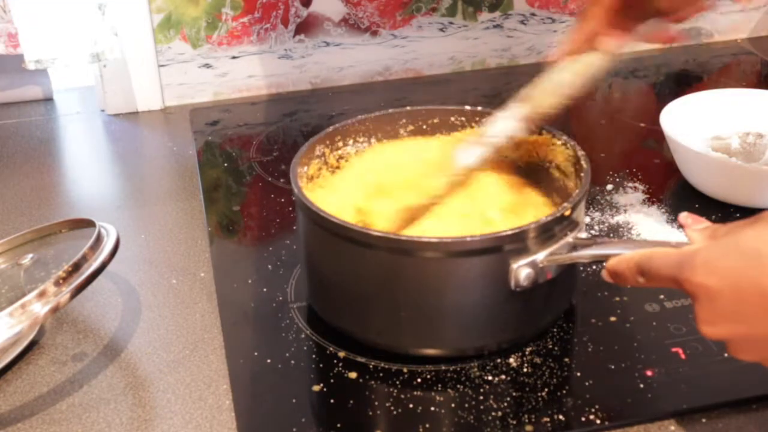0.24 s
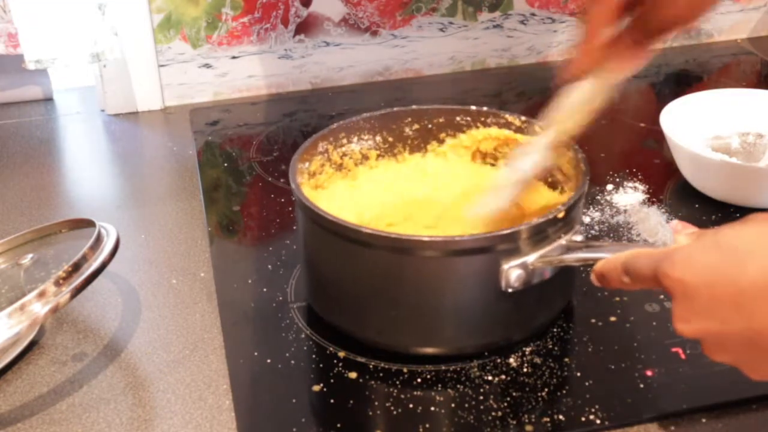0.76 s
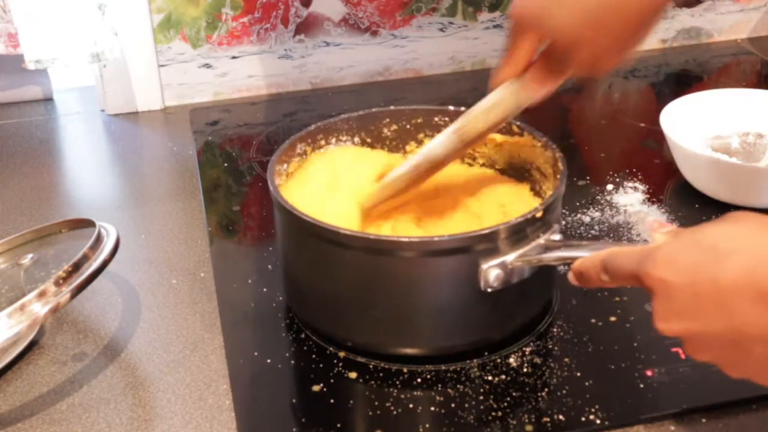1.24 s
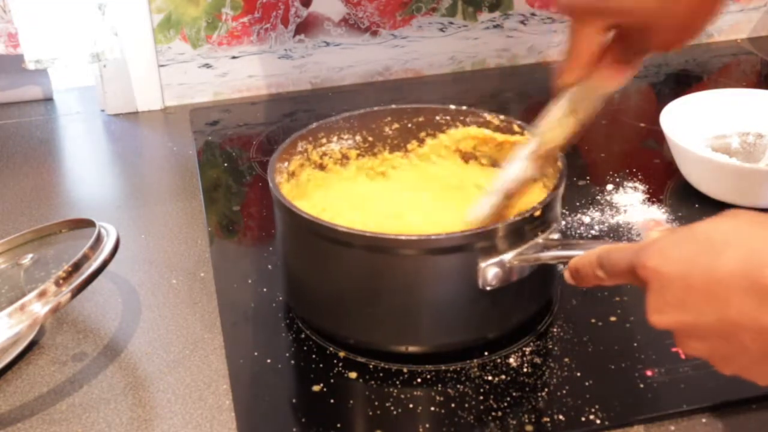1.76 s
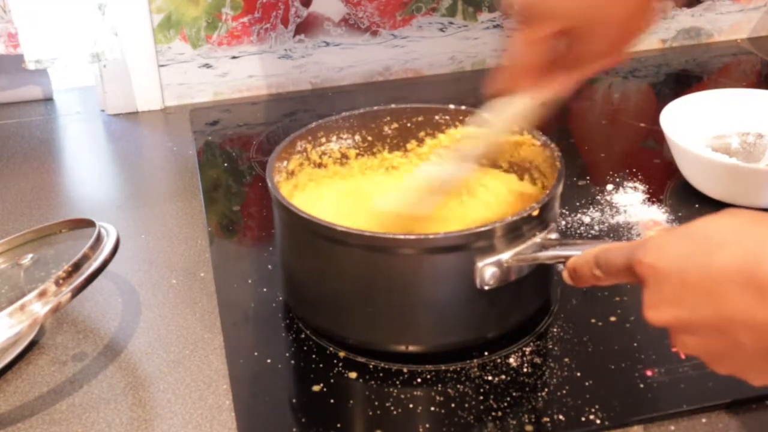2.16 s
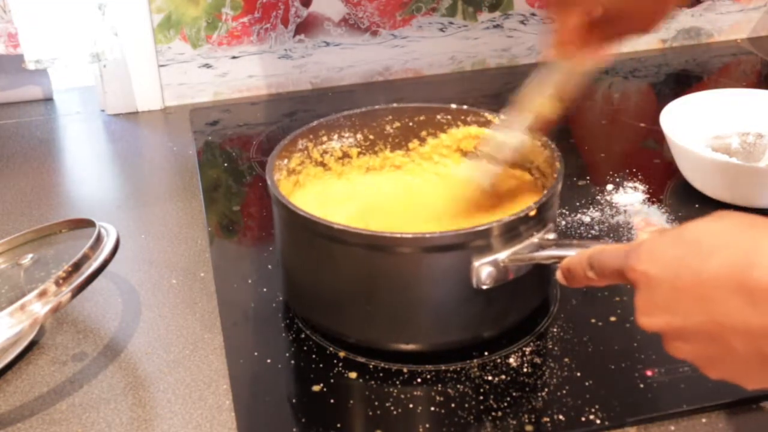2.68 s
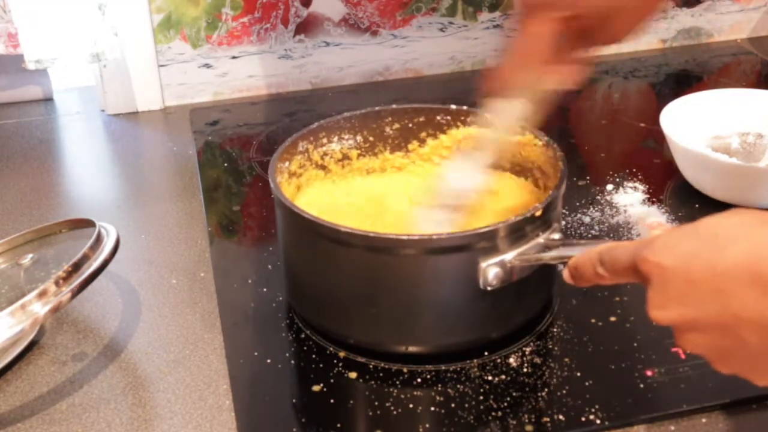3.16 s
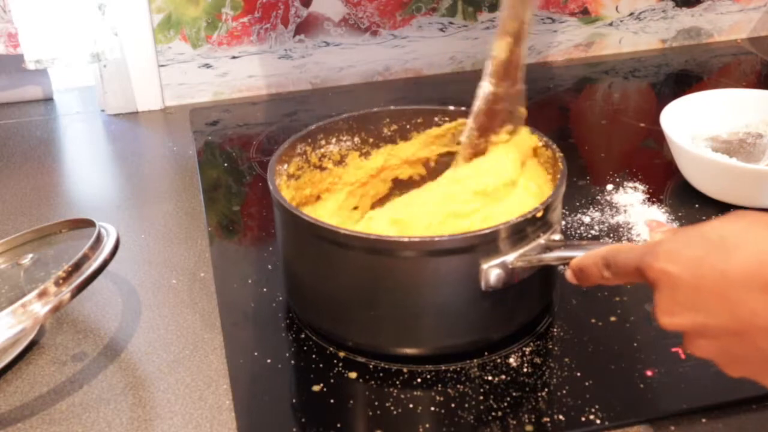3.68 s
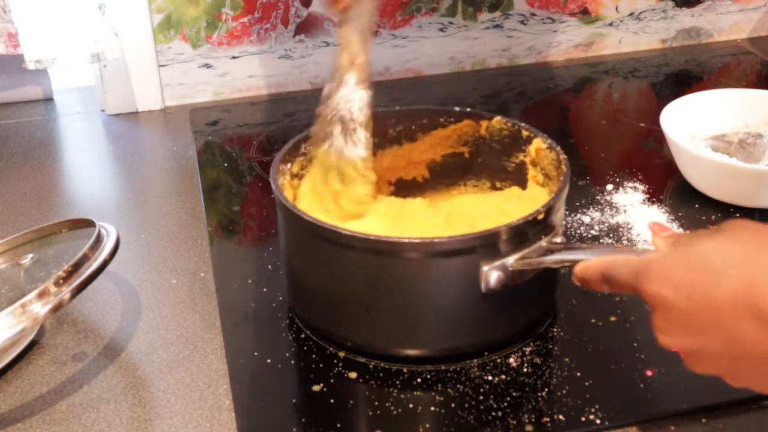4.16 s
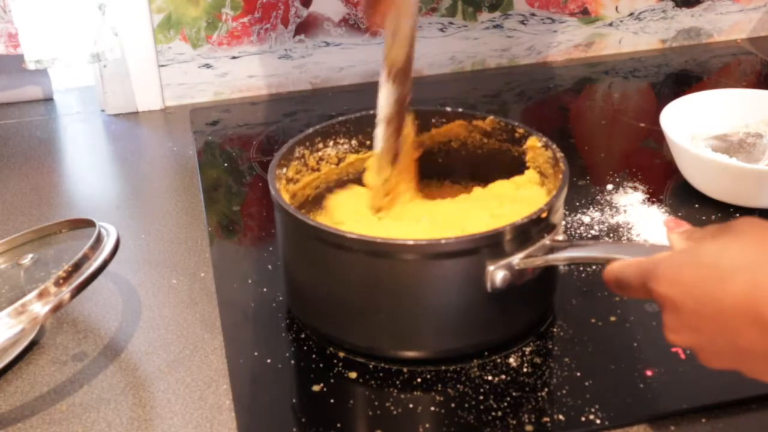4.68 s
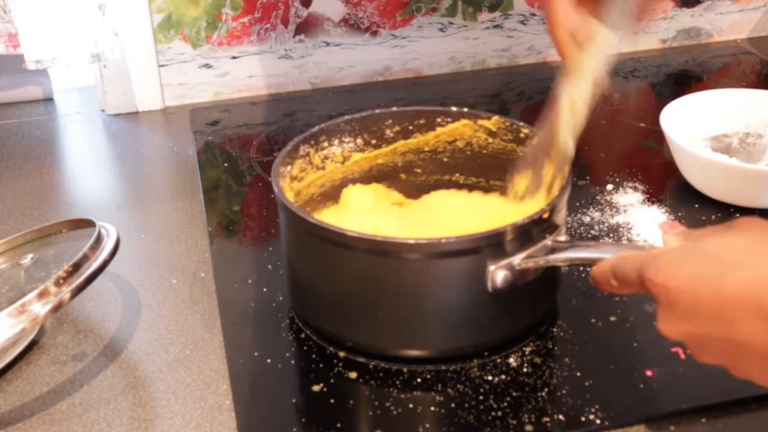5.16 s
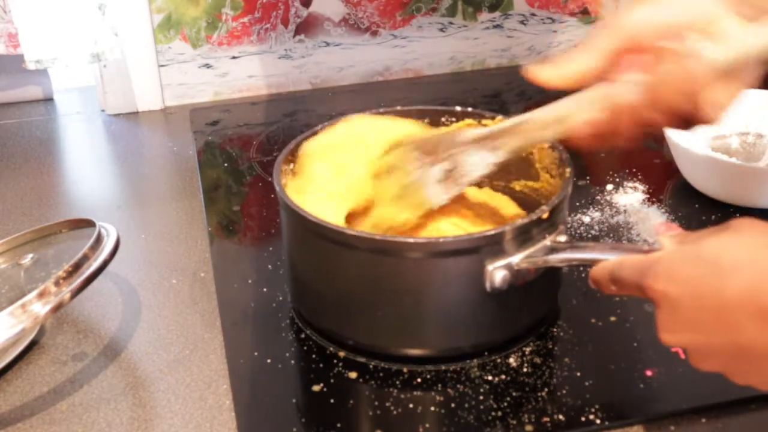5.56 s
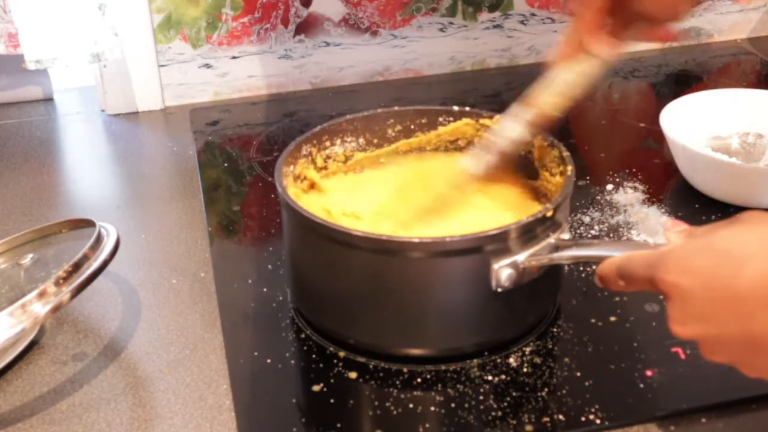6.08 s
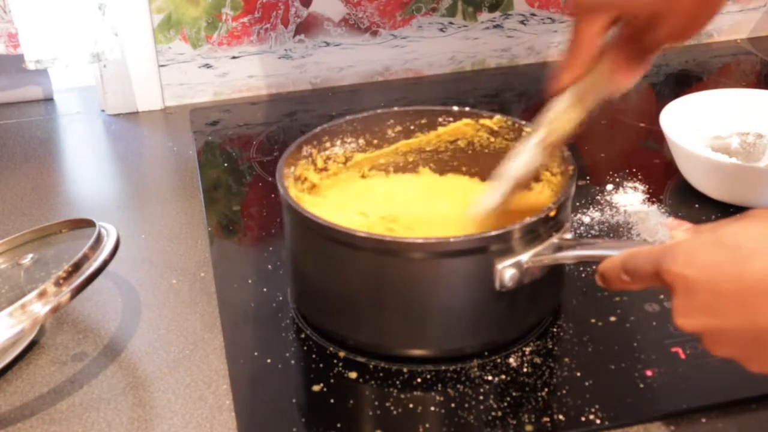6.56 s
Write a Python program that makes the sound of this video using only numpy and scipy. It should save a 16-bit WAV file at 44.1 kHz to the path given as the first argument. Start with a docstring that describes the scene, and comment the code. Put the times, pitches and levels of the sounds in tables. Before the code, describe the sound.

Close up in a small, hard-surfaced room, thick dough is stirred briskly in a saucepan. Wood bumps the filled pan with hollow, quickly damped knocks in an uneven rhythm. After about three seconds the knocking nearly stops, leaving scraping, moist peeling and little snaps; then scattered knocks resume and end strongest. A soft low rush of ventilation stays underneath.

```python
"""In a small kitchen, a wooden spatula works stiff dough round a metal saucepan on a glass hob.
Each turn bumps the pan softly through the dough, then knocks on its bare wall: fading sine waves make
the wood clack and the filled pan ring. Between knocks, random clicks and filters make the dough smear,
hiss and drag. Short noise bursts are its sticky ticks, and sliding resonances are skids on the metal."""
import sys
import numpy as np
from scipy import signal
from scipy.fft import rfft, irfft
from scipy.io import wavfile
from scipy.ndimage import uniform_filter1d

SR = 44100
rng = np.random.default_rng(int(sys.argv[2]) if len(sys.argv) > 2 else 0)


def store_pcm(level_fs):
    """Save levels as 16-bit WAV."""
    pcm = np.round(np.clip(level_fs, -1, 1) * 32767).astype(np.int16)
    wavfile.write(sys.argv[1], SR, np.atleast_2d(pcm).T)


N = 301203

# spatula against the pan: t/s, relative level/dB, hardness of the contact as its corner f/Hz,
# boost of the strongest pan modes/dB, boost of the wall mode/dB
KNOCKS = [(0.0, -14.5, 500, 12, -5), (0.344, -19.5, 580, 0, -5), (0.433, -21.5, 586, -13, 1),
          (.718, -34.5, 226, -13, -7), (0.843, -14, 850, 1.5, 0.5), (1.170, -18, 880, -1.5, 1.5),
          (1.428, -17.5, 530, -18, 0), (1.545, -18, 1020, 0.5, -5.5), (1.766, -28.5, 243, -1, -4),
          (1.891, -17, 1030, 2.5, -8), (2.119, -15, 664, -9, 1), (2.220, -13, 1190, 2, -3.5),
          (2.444, -15.5, 550, -19, 2), (2.559, -17.5, 900, 3, -4), (2.767, -25, 281, -6.5, 0),
          (2.841, -28.5, 1006, 7, 1), (3.111, -21.5, 485, -4, -10), (4.097, -38, 370, 11, 2),
          (4.733, -19, 1000, 2.5, -1.5), (5.141, -19.5, 1030, -1, -9), (5.192, -23, 650, -3, -7),
          (5.748, -28.5, 1170, -3, -1), (5.756, -17, 324, -4, -21), (6.165, -32, 394, 8, -1.5),
          (6.325, -18, 736, -6, 4), (6.568, -19, 497, -23, 3), (6.656, -12, 910, 5, 3.5)]


def amp(db):
    """Turns decibels into a gain."""
    return 10 ** (np.asarray(db) / 20)


def unit(x):
    """Scales a sound to an rms of 1."""
    return x / np.sqrt(np.mean(x ** 2) + 1e-20)


def read(points, hz):
    """Reads a table between its points, on a log-frequency axis."""
    f, value = np.transpose(points)
    return np.interp(np.log(hz + 1), np.log(f + 1), value)


def colour(x, points):
    """Filters a sound by a table of f/Hz, gain/dB."""
    size = x.shape[-1]
    hz = np.fft.rfftfreq(2 * size, 1 / SR)
    spectrum = rfft(x, 2 * size) * amp(read(points, hz))
    return irfft(spectrum)[..., :size]


def add(mix, s, sound):
    """Mixes a sound in at a time in seconds."""
    part = mix[max(round(s * SR), 0):][:len(sound)]
    part += sound[:len(part)]


def spread(pair):
    """Turns two unrelated signals into left and right, alike in the bass."""
    # width of diffuse sound: f/Hz, side over mid/dB
    side_over_mid = [(60, -26), (150, -14.5), (330, -13.5), (480, -7.5), (1000, -0.5), (3000, 0.5),
                     (8000, 2), (14000, 5)]
    side = colour(pair[1], side_over_mid)
    both = np.array([pair[0] + side, pair[0] - side])
    # take back the power that the side signal added
    return colour(both, [(hz, -10 * np.log10(1 + amp(db) ** 2)) for hz, db in side_over_mid])


def air(level_db=-48.5):
    """The steady rush of the hob's fan and the room, as filtered noise."""
    # steady kitchen background: f/Hz, relative level/dB
    air_colour = [(15, -52), (25, -24), (75, -23.5), (100, -2.5), (169, -4.5), (226, 0.5), (257, -5.5),
                  (391, -3), (978, -19.5), (1240, -16.5), (1410, -21), (1930, -16.5), (2380, -22),
                  (3530, -24.5), (13100, -32)]
    noise = spread(rng.standard_normal((2, N)))
    return amp(level_db) * unit(colour(noise, air_colour))


def kitchen(x, wet_db, echo_db, build_s=0.0028, lag_s=0.00008):
    """Direct sound, a few close reflections, and a diffuse tail that fades at its own rate at each pitch."""
    # wall, hood and cupboards: delay/s, relative level/dB
    echoes = [(.0058, -4), (0.0112, -4.5), (.0212, -11.5), (0.0255, -9.5)]
    # how long the tail lasts: f/Hz, time to fall by 60 dB/s
    tail_times = [(80, 1), (250, 0.16), (800, 0.39), (2500, 0.21), (6000, 0.73), (13000, 0.26)]
    noise = rng.choice([-1., 1.], (2, SR // 2))
    hz, t, z = signal.stft(noise, SR, nperseg=256)
    fade = amp(-60 * t / read(tail_times, hz)[:, None])
    tail = signal.istft(z * fade, SR, nperseg=256)[1]
    tail = spread(tail / np.linalg.norm(tail[0]))
    # tone of the room's tail: f/Hz, gain/dB; weaker in the bass, fullest near 2 kHz, dull at the top
    tail = colour(tail, [(100, -7), (330, 1), (520, -1), (2000, 4.5), (10000, -19.0)])
    build = 1 - np.exp(-np.arange(tail.shape[1]) / SR / build_s)
    response = amp(wet_db) * tail * build
    response[:, 0] += 1  # the direct sound
    for k, (delay, db) in enumerate(echoes):
        for channel, side in zip(response, (-1, 1)):
            # successive echoes reach left and right first in turn
            add(channel, delay + side * (-1) ** k * lag_s, amp([db + echo_db]))
    return signal.fftconvolve(x[None], response, axes=1)[:, :N]


def bareness(corner_hz, bare_above_hz=740, blend_hz=45.3):
    """Slides from 0 for a blow through dough to 1 for a blow on bare metal."""
    return 1 / (1 + np.exp((bare_above_hz - corner_hz) / blend_hz))


def swell(s, rise_s, hold_s, fade_db_per_s, sag_db_per_s=13.5):
    """One push of the blade as a gain: it rises, sags while held, then fades."""
    t = np.arange(N) / SR - s
    attack = np.sin(np.pi / 2 * np.clip(t / max(rise_s, 1 / SR), 0, 1)) ** 2
    sag_db = sag_db_per_s * np.clip(t - rise_s, 0, hold_s)
    fade_db = fade_db_per_s * np.maximum(t - rise_s - hold_s, 0)
    return attack * amp(-sag_db - fade_db)


def stirring():
    """Gains of peeling, smearing and drag: the powers of strokes and of the rubbing after blows add up."""
    # pushes through the dough: t/s, rise/s, hold/s, relative peeling/dB, relative smearing/dB
    strokes = [(0.0, 0.0013, 0.0029, -44.5, -31.5), (0.14, 0.16, 0.044, -47, -50.5),
               (0.619, 0.012, 0.029, -47, -48.5), (.812, 0.015, .005, -44, -37.5),
               (.95, 0.027, 0.033, -55, -54), (1.094, 0.11, 0.016, -44.5, -44.5),
               (1.285, .03, 0.011, -45.5, -48), (1.472, .05, .17, -46, -45.5),
               (1.817, .003, 0.064, -53, -46), (1.874, 0.03, 0.081, -43.5, -46.5),
               (2.116, 0.029, 0.073, -44, -41), (2.297, 0.027, .01, -44.5, -54),
               (2.479, 0.024, 0.055, -46.5, -43), (2.6, 0.046, 0.022, -49.5, -59),
               (2.83, 0.011, 0.074, -56, -39.5), (2.908, 0.016, 0.097, -47.5, -55),
               (3.133, 0.016, 0.072, -49, -48.5), (3.26, 0.18, 0.03, -44, -46),
               (3.461, 0.041, 0.065, -46.5, -44.5), (3.655, .03, 0.072, -55, -50),
               (3.903, 0.015, 0.19, -54.5, -57), (4.103, 0.12, 0.054, -51.5, -49.5),
               (4.242, 0.028, 0.023, -45, -42), (4.332, 0.023, 0.0099, -42, -41.5),
               (4.524, .07, 0.018, -68, -52.5), (4.85, .025, 0.024, -36.5, -42),
               (4.893, 0.029, .1, -41.5, -42), (5.021, 0.11, 0.26, -46, -43),
               (5.38, 0.047, 0.11, -56.5, -52.5), (5.66, 0.079, .005, -54.5, -72),
               (5.998, 0.13, 0.0099, -49, -51.5), (6.261, 0.046, 0.013, -43.5, -37),
               (6.404, 0.048, 0.041, -48, -62), (6.623, 0.019, 0.012, -40, -39.5),
               (6.768, 0.02, .04, -49, -69)]
    follow_cushioned_db, follow_bare_db = -20.5, -13  # rubbing after a blow, against the blow
    stroke_drag_db = 5  # drag on the pan against the stroke's smearing
    peeling, smearing, rubbing = np.zeros((3, N))
    for s, rise_s, hold_s, peel_db, smear_db in strokes:
        push = swell(s, rise_s, hold_s, fade_db_per_s=177)
        peeling += (amp(peel_db) * push) ** 2
        smearing += (amp(smear_db) * push) ** 2
    for s, db, corner_hz, *_ in KNOCKS:
        follow_db = follow_cushioned_db + (follow_bare_db - follow_cushioned_db) * bareness(corner_hz)
        rub = swell(s, rise_s=0.032, hold_s=0, fade_db_per_s=106)
        rubbing += (amp(db + follow_db) * rub) ** 2
    dragging = rubbing + amp(stroke_drag_db) ** 2 * smearing
    # the dough never quite stops moving: resting peel, smear and drag in dB
    rest = amp([[-62], [-60.5], [-48]])
    return np.sqrt(np.array([peeling, smearing, dragging]) + rest ** 2)


def grains(per_s, size_db):
    """A train of random clicks of varied size; a larger size_db makes the sizes more uneven."""
    sizes = amp(size_db * np.minimum(rng.exponential(1, N), 4))
    signs = rng.choice([-1, 1], N)
    happens = rng.random(N) < per_s / SR
    return unit(sizes * signs * happens)


def pockets(x, depth_db):
    """Hollows in the dough open and close, lifting narrow bands for a few hundredths of a second."""
    z = signal.stft(x, nperseg=512, noverlap=384)[2]
    patches = rng.standard_normal(z.shape[1:])
    patches = uniform_filter1d(patches, size=4, axis=0)  # across frequency
    patches = uniform_filter1d(patches, size=14, axis=1)  # across time
    lifted = z * amp(depth_db * unit(patches))
    return unit(signal.istft(lifted, nperseg=512, noverlap=384)[1][:, :N])


def dough(peeling, smearing, dragging, hiss_db=-2, drag_db=-5.0, rung_db=-9, clump_db=1.5):
    """Clumps of micro-slips hiss and smear under the blade, and their drag sets the pan humming."""
    # tone of peeling, of smearing and of rubbing: each f/Hz, relative level/dB
    hiss_colour = [(300, -14), (1500, -7.5), (3000, -2), (4600, 1), (6400, -0.5), (9000, -3), (11500, -1),
                   (13000, -16), (15500, -21)]
    smear_colour = [(300, -17), (900, -2.5), (1550, -3), (1850, -7), (2500, -4.5), (3400, -9), (5000, -19),
                    (9000, -57)]
    drag_colour = [(60, 9.5), (150, -2), (330, 9), (500, 6), (900, 5.5), (1400, -9), (2500, -14),
                   (6000, -54)]
    slow_noise = colour(rng.standard_normal(N), [(30, 20.0), (90, -2), (250, -72), (1000, -90)])
    clumps = amp(clump_db * unit(slow_noise))
    peel = colour(spread([grains(7000, 0.83), grains(7000, 1.4)]), hiss_colour)
    wet = colour(spread([grains(2000, 0.95), grains(2000, 4.0)]), smear_colour)
    rub = unit(colour(spread([grains(900, 0.67), grains(900, 3.4)]), drag_colour))
    pan = pan_ring(weight_db=-8.5, main_db=0, wall_db=1)
    rung = unit(signal.fftconvolve(grains(600, 2.2), pan)[:N])
    hiss = amp(hiss_db) * peeling * pockets(peel, depth_db=3.0)
    smear = smearing * pockets(wet, depth_db=3.0)
    drag = dragging * (amp(drag_db) * rub + amp(rung_db) * rung)
    return clumps * (hiss + smear + drag)


def small_ticks(peeling, count=30):
    """Small pockets burst at random moments, louder where the peeling is stronger."""
    over_peeling_db, spread_db = 12, 5
    middle_hz, spread_octaves, decay_s = 3900, 0.9, 0.0013
    at = rng.integers(0, N, count)
    luck = np.clip(rng.standard_normal((count, 2)), -2, 2)
    rows = []
    for i, (loud, high) in zip(at, luck):
        db = 20 * np.log10(peeling[i]) + over_peeling_db + spread_db * loud
        rows.append((i / SR, db, middle_hz * 2 ** (spread_octaves * high), decay_s))
    return rows


def ticks(peeling, band=1.5):
    """Pockets snap open as the dough parts from the metal: short bursts of band-limited noise."""
    # the larger pockets letting go: t/s, relative peak level/dB, centre f/Hz, decay/s
    large_ticks = [(0.432, -30.5, 1300, 0.0046), (.829, -26.5, 7400, 0.0053), (1.469, -30, 4460, 0.0032),
                   (1.735, -29, 7030, 0.00092), (1.822, -32, 1300, 0.003), (2.398, -26, 2310, 0.0015),
                   (2.503, -25.5, 6000, 0.00054), (2.558, -28, 6900, 0.0044), (2.856, -27, 2410, 0.0026),
                   (2.903, -37, 1500, 0.0046), (3.146, -24, 6940, 0.0011), (3.166, -29.5, 1980, 0.0071),
                   (3.212, -36, 1770, .0044), (3.655, -31.5, 1440, 0.0059), (4.275, -30, 5400, 0.0049),
                   (4.333, -32, 2450, .0026), (4.733, -27, 3130, 0.0021), (5.346, -27, 8700, 0.00097),
                   (5.750, -28.5, 2150, 0.0059), (6.360, -30.5, 2470, 0.0045), (6.609, -25, 7260, 0.0013),
                   (6.627, -24, 2220, 0.0016), (6.642, -20.5, 5570, 0.0039)]
    out = np.zeros(N)
    t = np.arange(SR // 30) / SR
    for s, db, hz, decay_s in list(large_ticks) + small_ticks(peeling):
        edges = np.clip([hz / band, hz * band], 200, [15000, 17000])
        burst = rng.standard_normal(len(t)) * np.exp(-t / decay_s)
        snap = signal.sosfilt(signal.butter(2, edges, "band", fs=SR, output="sos"), burst)
        add(out, s, amp(db) * snap / abs(snap).max())
    return out


def skids(width_hz=160, upper=1.62, upper_db=-10):
    """Irregular slips of wood on metal drive a sliding resonance and a weaker one above it."""
    # the blade skids on the bare wall: t/s, length/s, relative level/dB, start f/Hz, end f/Hz
    skid_rows = [(0.8, 0.06, -42.5, 1420, 1740), (1.12, 0.074, -46, 1420, 1510),
                 (1.491, 0.035, -38.5, 1450, 1560), (1.839, 0.086, -48.5, 1470, 1630),
                 (2.173, 0.072, -38.5, 1410, 1650), (2.491, 0.057, -44.5, 1450, 1540),
                 (2.818, 0.051, -38.5, 1460, 1480), (4.845, 0.078, -34.5, 2360, 1820),
                 (4.882, 0.24, -44, 1480, 1190), (5.137, 0.036, -37.5, 800, 660),
                 (6.254, 0.056, -48.5, 1550, 1540), (6.623, 0.061, -35.5, 1450, 1490)]
    out = np.zeros(N)
    r = np.exp(-np.pi * width_hz / SR)
    for s, length, db, start_hz, end_hz in skid_rows:
        size = int(length * SR)
        happens = rng.random(SR // 4) < 1500 / SR  # about 1500 slips per second
        slips = (rng.standard_normal(SR // 4) * happens)[:size]
        angle = 2 * np.pi * np.cumsum(np.linspace(start_hz, end_hz, size)) / SR
        rasp = 0
        for ratio, gain in ((1, 1), (upper, amp(upper_db))):
            # shift down to 0 Hz, smooth there, and shift back up
            turn = np.exp(1j * ratio * angle)
            smooth = signal.lfilter([1 - r], [1, -r], slips / turn)
            rasp = rasp + gain * (turn * smooth).real
        add(out, s, amp(db) * unit(rasp) * signal.windows.tukey(size, 0.6))
    return out


def blade_clack(weight_db, low_hz=250):
    """The wood's few broad modes are sine waves of alternating sign that die almost at once."""
    # the wooden blade's dead clack: f/Hz, relative level/dB, time to fall by 60 dB/s
    blade_modes = [(184, 5.5, 0.02), (370, 14, 0.0065), (706, 11.5, 0.009), (900, 6, 0.0085),
                   (1310, 3.5, 0.012), (3830, 12.5, 0.0032)]
    t = np.arange(SR // 2) / SR
    clack = np.zeros(len(t))
    for k, (hz, db, t60) in enumerate(blade_modes):
        start_db = db + weight_db / (1 + (hz / low_hz) ** 8)  # the weight acts on low modes
        clack += (-1) ** k * amp(start_db - 60 * t / t60) * np.sin(2 * np.pi * hz * t)
    return clack


def pan_ring(weight_db, main_db, wall_db, low_hz=250, place_db=2.5, rise_s=0.001):
    """The pan's modes swell as the blow runs round its wall; each place of contact excites them differently."""
    # the pan, damped by its dough: f/Hz, relative level/dB, time to fall by 60 dB/s
    pan_modes = [(61, -15.5, 0.256), (156.7, -4, 0.13), (226.9, 1, 0.16), (241.2, -20, 0.44),
                 (283.3, 1, 0.18), (327, 3.63, 0.28), (393, -0.5, 0.12), (434, -16.5, 0.33),
                 (528, -15, 0.31), (567.5, -12, 0.19), (690, 0, 0.045), (716, -11, 0.22), (793, -17, 0.35),
                 (862, -22, 0.24), (900, 4.5, 0.054), (1062, 2.5, 0.029), (1138, -3, 0.038),
                 (1236, 4.5, 0.017), (1360, -0.5, 0.026), (1450, -4, 0.059), (1587, -3, 0.035),
                 (2060, -24.5, 0.04), (2437, -13, 0.15), (2956, -10, 0.051)]
    wall_hz = 328  # the mode nearest to this is the wall mode
    t = np.arange(SR // 2) / SR
    hz, db, t60 = np.transpose(pan_modes)[:, :, None]
    luck, phase = rng.standard_normal((2, len(pan_modes), 1))
    change_db = np.where(db == db.max(), main_db, place_db * luck)
    db = db + change_db + weight_db / (1 + (hz / low_hz) ** 8)
    distance = abs(hz - wall_hz)
    db = db + wall_db * (distance == distance.min())
    # higher modes have finer shapes, so their phase depends more on the place
    waves = np.sin(2 * np.pi * hz * t + phase * (hz / 550) ** 2)
    modes = amp(db - 60 * t / t60) * waves
    return modes.sum(0) * (1 - np.exp(-t / rise_s))


def knocks(crack_db=-42, clack_db=0.5):
    """Blows on blade and pan; dough in between lengthens the contact and dulls them. Returns clacks and rings."""
    # a blow through dough shoves the whole pan and weighs on its low modes; a bare one does not
    cushioned_db, bare_db = 3, -7
    clacks, rings = np.zeros((2, N))
    for s, db, corner_hz, main_db, wall_db in KNOCKS:
        weight_db = cushioned_db + (bare_db - cushioned_db) * bareness(corner_hz)
        clack = amp(clack_db) * blade_clack(weight_db)
        parts = np.array([clack, pan_ring(weight_db, main_db, wall_db)])
        contact = signal.butter(3, corner_hz, fs=SR, output="sos")
        parts = signal.sosfilt(contact, parts) + amp(crack_db) * parts  # a trace stays bright
        # both parts share one level, taken over the first 1/32 s
        parts = amp(db) * parts / np.linalg.norm(parts[:, :SR // 32].std(1))
        add(clacks, s, parts[0])
        add(rings, s, parts[1])
    return clacks, rings


def scene():
    """Background, dough and pan in stereo; clacks, ticks and skids give distinct echoes, rings do not."""
    peeling, smearing, dragging = stirring()
    clacks, rings = knocks()
    snaps = kitchen(ticks(peeling), wet_db=0, echo_db=-8)
    rasps = kitchen(skids(), wet_db=1, echo_db=-4)
    wood = kitchen(clacks, wet_db=1, echo_db=-1)
    metal = kitchen(rings, wet_db=-5.5, echo_db=-np.inf)
    soft = air() + dough(peeling, smearing, dragging)
    return soft + amp(-3.1) * snaps + amp(-4.0) * (rasps + wood + metal)


def record(dry):
    """The microphone rolls off at both ends, then a steep filter cuts the top."""
    lean = signal.sosfilt(signal.butter(3, 43, "high", fs=SR, output="sos"), dry)
    toned = colour(lean, [(11800, 3), (13200, -2.5), (15500, -17)])
    steep = signal.firwin(511, 15700, window=("kaiser", 9), fs=SR)  # low-pass, corner in Hz
    return signal.oaconvolve(toned, steep[None], "same")


dry = scene()
out = record(dry)
store_pcm(out)
```